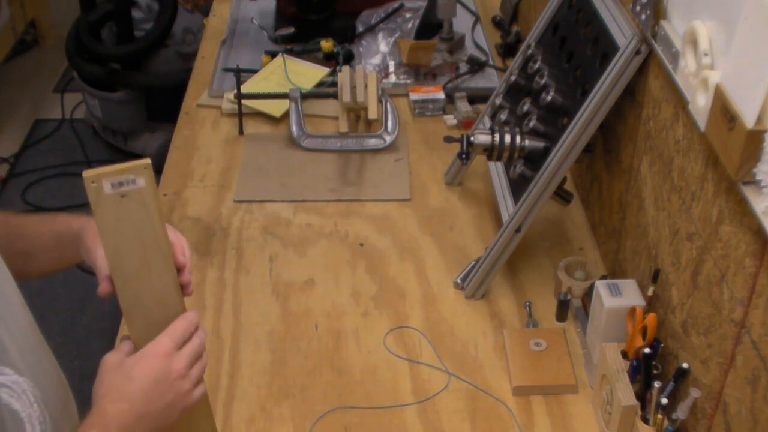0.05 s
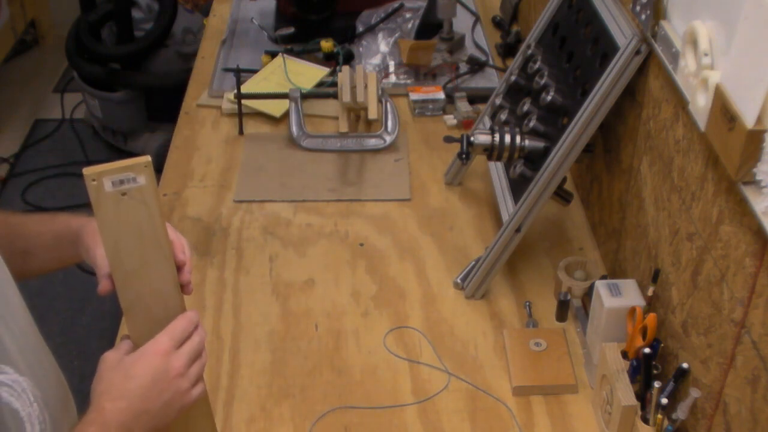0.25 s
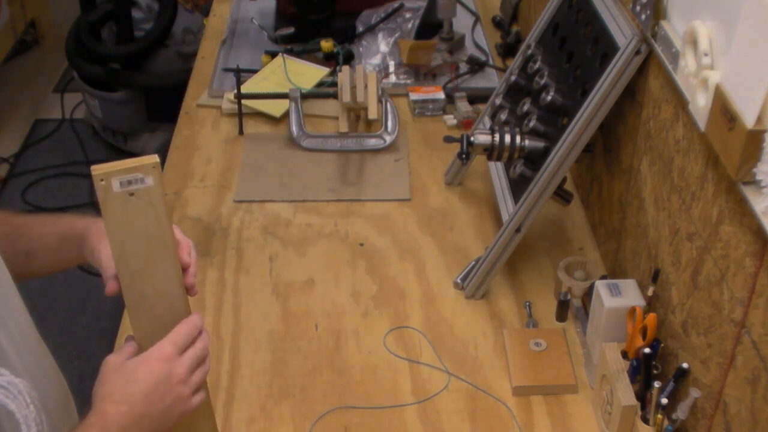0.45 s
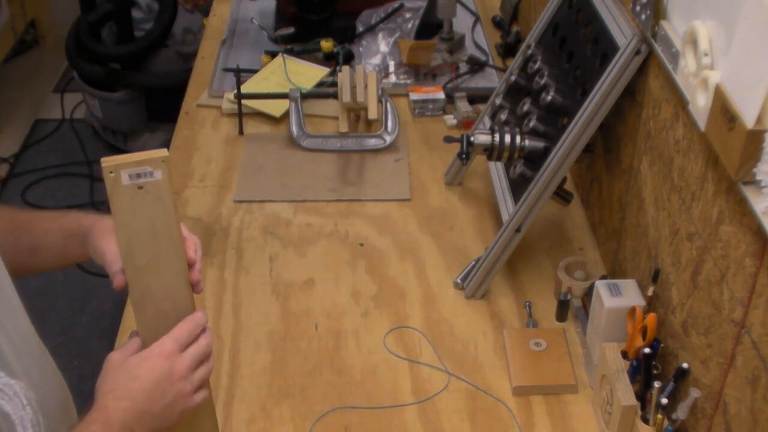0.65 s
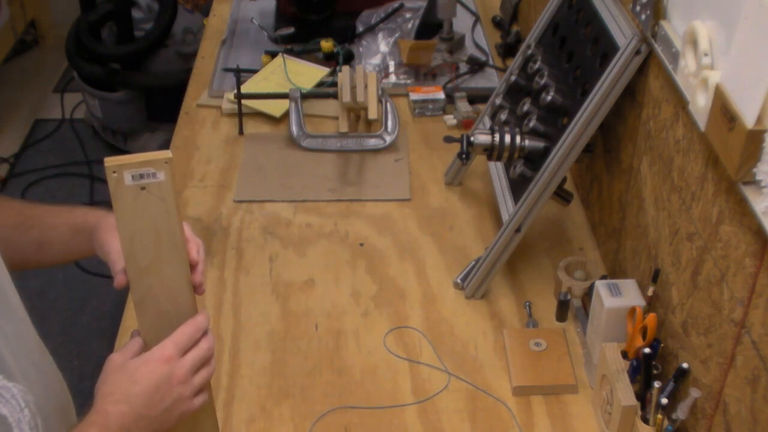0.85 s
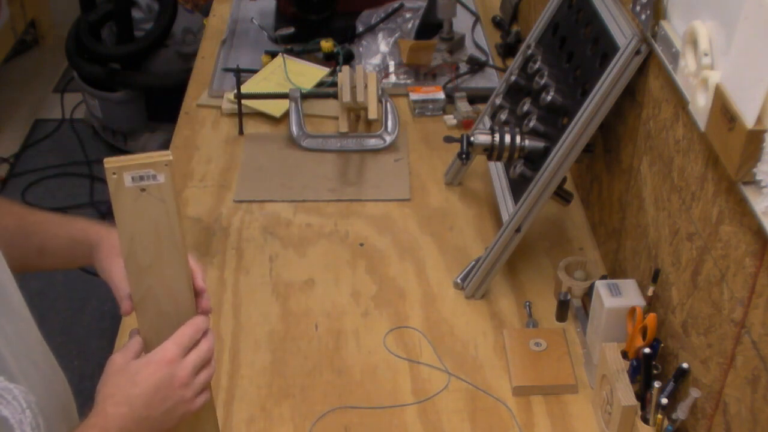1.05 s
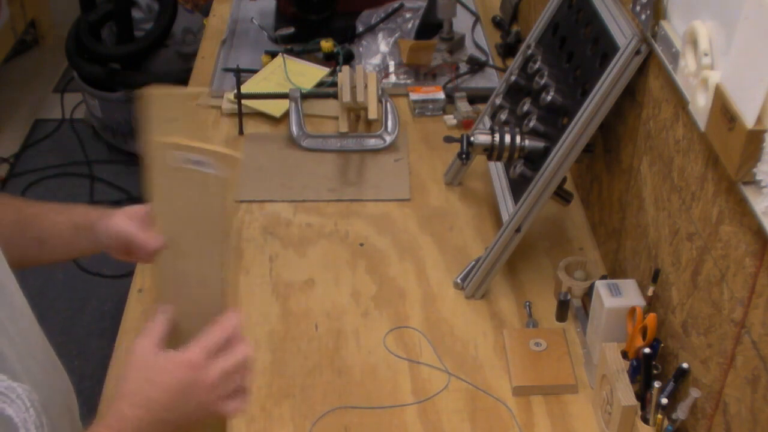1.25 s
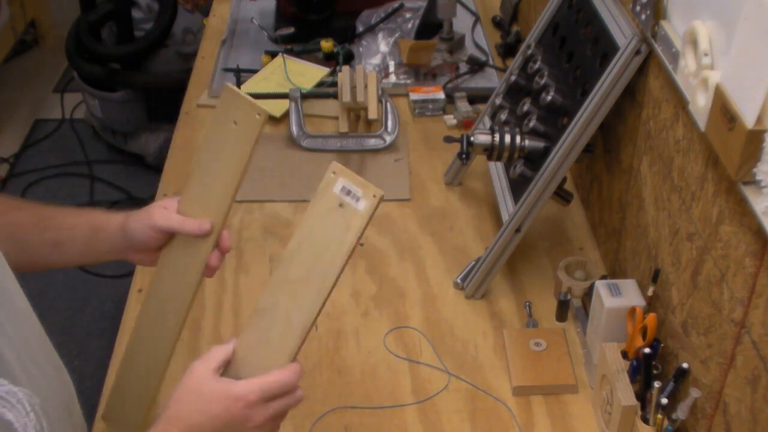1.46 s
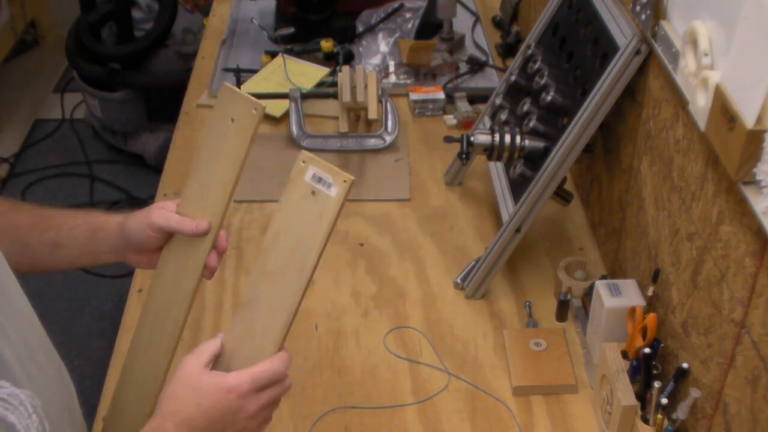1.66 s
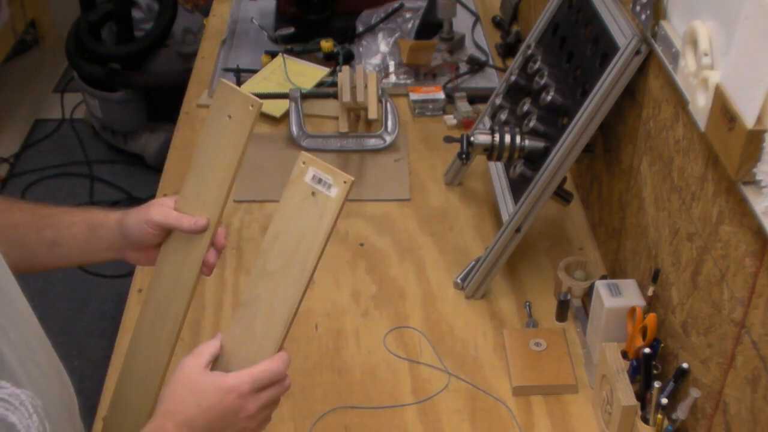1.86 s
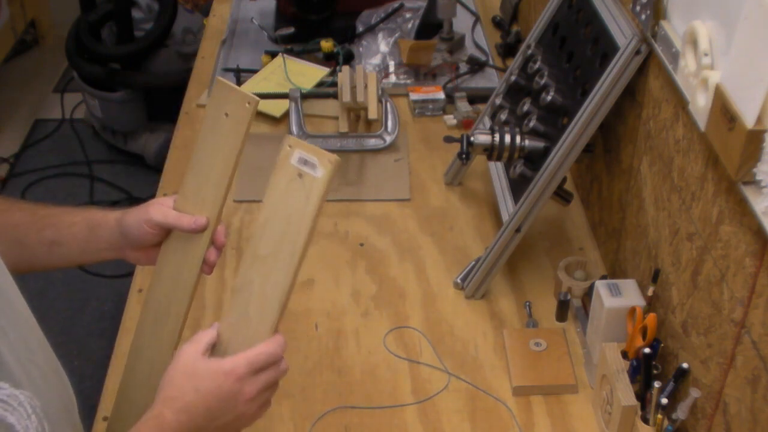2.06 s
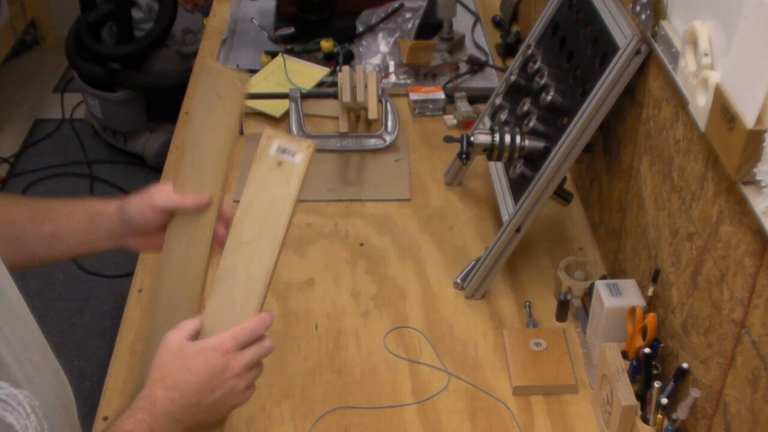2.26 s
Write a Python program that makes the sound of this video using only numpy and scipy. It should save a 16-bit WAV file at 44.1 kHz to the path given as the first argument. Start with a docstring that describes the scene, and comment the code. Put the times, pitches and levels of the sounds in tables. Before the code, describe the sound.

Two wooden slats bump a bench several times in quick succession, the first knock loudest. Then wood rubs softly on wood with a brief squeak, heard nearby in a small room with faint, steady air noise.

```python
"""Wooden slats on a workbench

Two slats, held together, knock on a plywood bench in a small workshop: each impact excites
damped modes of the wood, and low room modes swell into a boom. Then the slats slide apart, and friction
drives their resonances in a dry scrape and a brief squeak, over steady ventilation and microphone hiss."""
import sys
import numpy as np
from scipy import signal
from scipy.fft import rfft, irfft, next_fast_len
from scipy.io import wavfile
from scipy.ndimage import uniform_filter1d

SR = 44100
rng = np.random.default_rng(int(sys.argv[2]) if len(sys.argv) > 2 else 0)


def unload_audio(sound):
    """Save the sound as a 16-bit wav file, at the path given as the first command line argument."""
    columns = np.transpose(np.atleast_2d(sound))
    # keep every value between -1 and 1, then stretch to whole-number steps
    steps = np.round(np.clip(columns, -1, 1) * 32767)
    wavfile.write(sys.argv[1], SR, steps.astype(np.int16))


N = 101385
T = np.arange(N) / SR

# likeness of left and right for scrape and ventilation: (frequency [Hz], correlation [-1..1])
STEREO_CORRELATION = [(60, 0.75), (180, 0.96), (550, 0.97), (1650, 0.74), (4970, 0.24), (15000, -0.19)]


def amp(db):
    """Amplitude ratio of a level in decibels."""
    return 10 ** (np.asarray(db) / 20)


def unit_rms(x):
    """Normalisation to a mean square of one."""
    return x / np.sqrt(np.mean(x ** 2) + 1e-20)


def curve_at(points, hz):
    """Interpolation of (frequency [Hz], value) points on a logarithmic frequency axis."""
    point_hz, values = np.transpose(points)
    return np.interp(np.log(hz + 1), np.log(point_hz + 1), values)


def filtered(x, response):
    """Linear filtering: the spectrum is multiplied by a frequency response."""
    size = next_fast_len(N + SR // 2)
    return irfft(rfft(x, size) * response(np.fft.rfftfreq(size, 1 / SR)), size)[..., :N]


def high_pass(corner_hz):
    """Fourth-order high-pass response, as of a panel that radiates little below its first mode."""
    return lambda hz: (-(hz / corner_hz) ** 2 / (1 - (hz / corner_hz) ** 2 + 1j * hz / corner_hz)) ** 2


def resonances(modes):
    """Frequency response of damped resonators, summed with alternating signs."""
    return lambda hz: sum((-1) ** k * amp(db) * 1j * hz * width / (centre ** 2 - hz ** 2 + 1j * hz * width)
                          for k, (centre, width, db) in enumerate(modes))


def spread(pair, correlation):
    """Mid-side mixing gives two independent signals a set correlation at each frequency."""
    angle = lambda hz: np.arccos(np.clip(curve_at(correlation, hz), -1, 1)) / 2
    mid, side = filtered(pair, lambda hz: np.array([np.cos(angle(hz)), np.sin(angle(hz))]))
    return np.array([mid + side, mid - side])


def struck_modes(modes, t, tilt_db, first_db, rise_s, choke, scatter_db=1.5):
    """Free vibration as a sum of decaying modes; a choke above 1 holds them, then stops them quickly."""
    pivot_hz = modes[1][0]
    vibration = 0
    for k, (hz, db, t60) in enumerate(modes):
        start_db = db + first_db * (k == 0) + tilt_db * np.log2(hz / pivot_hz) + scatter_db * rng.normal()
        vibration += amp(start_db - 60 * (t / t60) ** choke) * np.sin(2 * np.pi * hz * t)
    return (1 - np.exp(-t / rise_s)) * vibration


def knocks():
    """Impact excitation: each knock cracks and rings the bench, then low room modes swell into a boom."""
    # (time [s], level [dB], boom [dB], boom tilt [dB/octave], first boom mode [dB],
    #  first bench mode [dB], bench tilt [dB/octave], crack [dB], crack T60 [s])
    impacts = [(-.001, -10, -3.5, 2.5, -10.5, 6, -2, -9.5, 0.1),
               (.052, -26, 0, 2.5, -8.5, 0, 1, -18, 0.094),
               (0.1998, -21.5, -3, 2, -2.5, -7, -2.5, -19, 0.092),
               (.3605, -20, -3, 4.5, 0, -15, 1.5, -12, 0.062),
               (.99, -47, 6.5, -1.5, -5, 12, -2, -30, 0.034), (2.282, -47.5, 10, 0, 1, -7, 10, -26, .06)]
    # modes of bench top and slats: (frequency [Hz], level [dB], T60 [s])
    bench_modes = [(377.4, -6, 0.26), (395, -2, 0.19), (419.7, -3, .15), (444.6, -1, 0.14),
                   (495.5, 5, 0.045), (520.6, -13.5, 0.17), (554.3, -3.5, 0.091), (636.7, -7.5, 0.13),
                   (755, -14, 0.21), (826.7, -9.5, .13), (915, -15.5, 0.17), (931, -22.5, 0.097),
                   (1066, -24.5, 0.095), (1370, -22, 0.1), (1578, -22, 0.086), (2015, -19.5, .06),
                   (837, -10, 0.047), (1430, -17, 0.042)]
    # low room modes: (frequency [Hz], level [dB], T60 [s])
    room_modes = [(148, 0, .16), (86, -3, .13), (167, -4, .16), (208, -13, .12)]
    # contact noise: (frequency [Hz], spectral level [dB])
    crack_spectrum = [(300, -19), (1000, -3), (2000, -12), (6000, -23.5), (8000, -34), (12000, -26),
                      (16000, -40)]
    noise = unit_rms(filtered(rng.standard_normal(N), lambda hz: amp(curve_at(crack_spectrum, hz))))
    top, boom = np.zeros((2, N))
    for start, db, boom_db, boom_tilt, boom_first, bench_first, bench_tilt, crack_db, crack_t60 in impacts:
        t = np.maximum(T - start, 0)
        crack = (1 - np.exp(-t / 0.001)) * amp(crack_db - 60 * t / crack_t60) * noise
        bench = struck_modes(bench_modes, t, bench_tilt, bench_first, rise_s=0.0011, choke=1.11)
        swell = struck_modes(room_modes, t, boom_tilt, boom_first, rise_s=0.01, choke=1.7)
        top += amp(db) * (bench + crack)
        boom += amp(db + boom_db) * swell
    return filtered(top, high_pass(corner_hz=352)) + filtered(boom, high_pass(corner_hz=27))


def reverberation(source):
    """Convolution with the workshop's diffuse tail, in which each frequency decays at its own rate."""
    # reverberation time: (frequency [Hz], T60 [s])
    decay_times = [(100, 0.19), (500, 0.32), (2000, 0.41), (10000, 0.19)]
    # likeness of left and right in the tail: (frequency [Hz], correlation [-1..1])
    correlation = [(100, .9), (400, 0.98), (1000, 0.9), (5000, -0.3), (15000, -.2)]
    noise = spread(rng.standard_normal((2, N)), correlation)[:, :SR // 2]
    hz, t, spectra = signal.stft(noise, SR, nperseg=256)
    tail = signal.istft(spectra * amp(-60 * t / curve_at(decay_times, hz)[:, None]), SR, nperseg=256)[1]
    delayed = np.pad(source, (250, 0))
    return signal.fftconvolve(delayed[None], tail / np.linalg.norm(tail[0]), axes=1)[:, :N]


def ventilation(level_db=-42.5, patch_db=1.5):
    """Broadband air noise and microphone hiss, faintly patchy and coloured by resonant peaks."""
    # ventilation and hiss: (frequency [Hz], spectral level [dB])
    spectrum = [(15, -51), (25, -46), (43, -12.5), (165, -10.5), (234, -26), (253, -9), (331, -13),
                (369, 0), (470, -8), (510, -4), (743, -13.5), (897, -10), (1030, -16.5), (2430, -20),
                (5160, -23), (6940, -31.5), (15600, -32.5)]
    # resonant peaks in the background noise: (frequency [Hz], half-width [Hz], boost [dB])
    background_peaks = [(356, 53, 2.5), (480, 16.7, 6.5), (684, 26, 7), (5620, 270, 4)]
    spectra = signal.stft(rng.standard_normal((2, N)), nperseg=512)[2]
    patches = uniform_filter1d(rng.standard_normal(spectra.shape[1:]), size=5, axis=0)  # across frequency
    patches = uniform_filter1d(patches, size=6, axis=1)  # across time
    noise = signal.istft(spectra * amp(patch_db * unit_rms(patches)), nperseg=512)[1][:, :N]
    peak_db = lambda hz: sum(db / (1 + ((hz - centre) / width) ** 2)
                             for centre, width, db in background_peaks)
    air = filtered(noise, lambda hz: amp(curve_at(spectrum, hz) + peak_db(hz)))
    return amp(level_db) * unit_rms(spread(air, STEREO_CORRELATION))


def fan_whine(shaft_hz=58.155, linewidth_hz=1.72):
    """Faint motor tones at harmonics of the shaft speed, each broadened by a random walk of phase."""
    # motor harmonics: (order [multiple of shaft speed])
    orders = [21, 78, 80, 83, 85, 86, 87, 88, 90, 91, 94, 96, 99]
    # strength of each harmonic: (level [dB])
    levels = [-62, -80.5, -76.5, -68, -72.5, -73, -69.5, -66, -66.5, -75.5, -68, -90, -70.5]
    phase_steps = rng.standard_normal((len(levels), N)) * np.sqrt(2 * np.pi * linewidth_hz / SR)
    return sum(np.sqrt(2) * amp(db) * np.sin(2 * np.pi * order * shaft_hz * T + phase)
               for order, db, phase in zip(orders, levels, np.cumsum(phase_steps, axis=1)))


def grit(rate_per_s=15000, scatter_db=1.5):
    """Shot noise: grit under the sliding contact gives dense impulses of random strength."""
    hits = rng.random((2, N)) < rate_per_s / SR
    return hits * rng.standard_normal((2, N)) * amp(scatter_db * rng.exponential(size=(2, N)))


def slide():
    """Frictional excitation: grit makes a broad scrape and drives both slats and a squeak resonance."""
    # course of the slide: (time [s], scrape [dB], upper slat [dB], lower slat [dB], squeak [dB])
    envelopes = [(.95, -76, -68, -81, -80), (.985, -54, -66, -74, -80), (1.09, -53.5, -67, -59, -66),
                 (1.159, -45, -57, -47, -53), (1.184, -49, -47, -58, -69), (1.189, -40, -36.5, -53, -65),
                 (1.199, -33, -30.5, -67, -47), (1.208, -43, -40, -56, -48), (1.222, -48.5, -51, -65, -58),
                 (1.258, -55, -60, -56, -62), (1.264, -52, -50, -39, -61), (1.272, -50, -58, -58, -57),
                 (1.315, -58, -67, -55.5, -70), (1.328, -43, -75, -41.5, -65), (1.345, -41, -60, -34, -42),
                 (1.361, -44.5, -58, -44, -42), (1.404, -43.5, -57, -50, -58), (1.42, -49, -67, -70, -58),
                 (1.455, -37.5, -63, -66, -74), (1.5, -49, -71, -67, -77), (1.57, -69, -80, -80, -78)]
    # friction noise: (frequency [Hz], spectral level [dB])
    scrape = [(1000, -2.5), (2500, 0.5), (6000, 6.5), (8000, -1), (12000, 2.5), (16000, -1)]
    # resonances of each slat and of the squeak: (frequency [Hz], bandwidth [Hz], level [dB])
    upper_slat = [(3570, 110, -3.5), (4360, 160, 0.5), (6000, 230, -10), (9270, 1100, -11.5),
                  (11300, 450, -5.5), (13600, 2000, -11)]
    lower_slat = [(2970, 160, 0), (3900, 150, -10), (4740, 130, -1), (6620, 130, -8)]
    squeak = [(2125, 45, 0)]
    times, *levels = np.transpose(envelopes)
    responses = [lambda hz: amp(curve_at(scrape, hz)), *map(resonances, (upper_slat, lower_slat, squeak))]
    friction = 0
    for db, response in zip(levels, responses):
        steady_rms = np.std(filtered(grit(), response))
        envelope = amp(np.interp(T, times, db, left=-120, right=-120))
        friction += filtered(envelope * grit(), response) / steady_rms
    return spread(friction, STEREO_CORRELATION)


def scene():
    """Superposition of knocks, their reverberation, slide and background, balanced left to right."""
    # stereo balance: (frequency [Hz], left minus right [dB])
    balance = [(60, 5), (240, 1.0), (950, 1), (3770, -1), (15000, 1.0)]
    wood = knocks()
    room = amp(-7.5) * reverberation(filtered(wood, high_pass(corner_hz=150)))
    mix = wood + room + slide() + ventilation() + fan_whine()
    return filtered(mix, lambda hz: amp(curve_at(balance, hz) / 2 * np.array([[1], [-1]])))


def record(dry):
    """Automatic gain control ducks after loud sounds and recovers steadily; a band limit follows."""
    threshold_db, duck_per_db, recovery_db_per_s, band_limit_hz = -9, 0.2, 9, 15750
    power = uniform_filter1d(np.mean(dry ** 2, 0), size=441)  # 10 ms mean
    level_db = 10 * np.log10(np.abs(power) + 1e-12)
    demand_db = duck_per_db * np.maximum(level_db - threshold_db, 0)
    recovery_db = recovery_db_per_s * T
    duck_db = np.maximum.accumulate(demand_db + recovery_db) - recovery_db
    return filtered(dry * amp(-duck_db), lambda hz: hz < band_limit_hz)


dry = scene()
out = record(dry)
unload_audio(out)
```